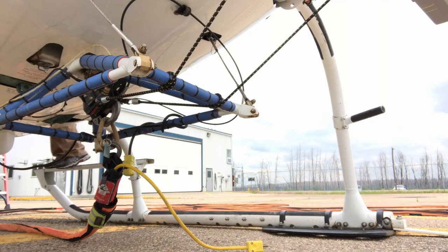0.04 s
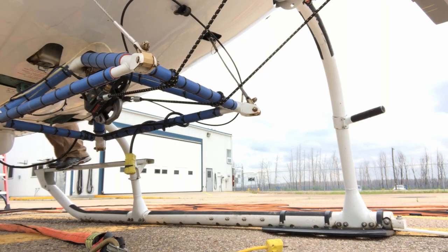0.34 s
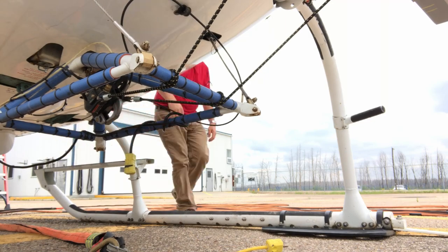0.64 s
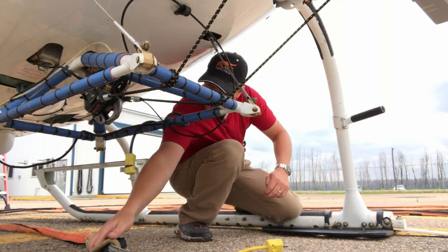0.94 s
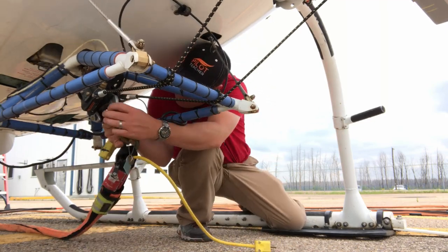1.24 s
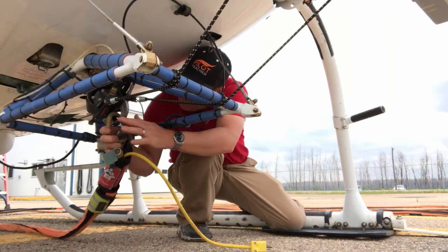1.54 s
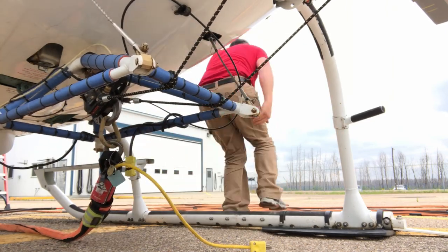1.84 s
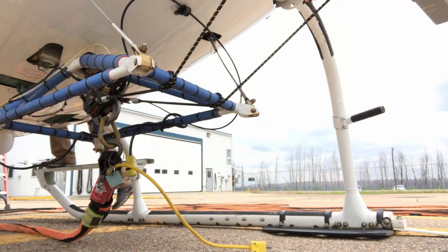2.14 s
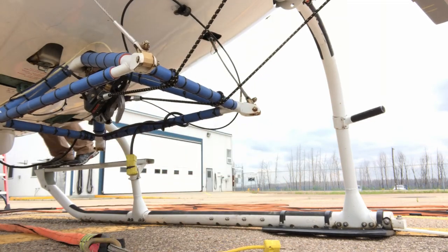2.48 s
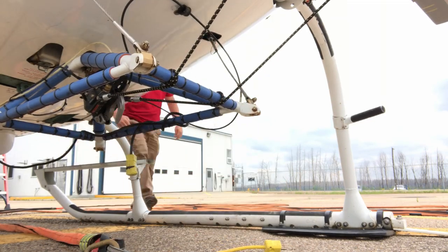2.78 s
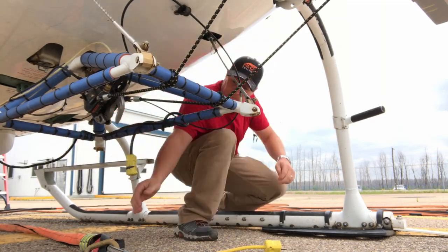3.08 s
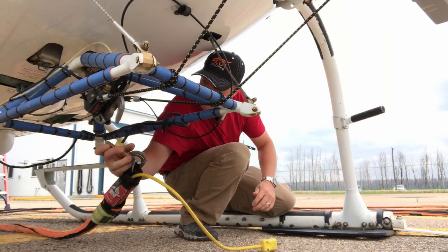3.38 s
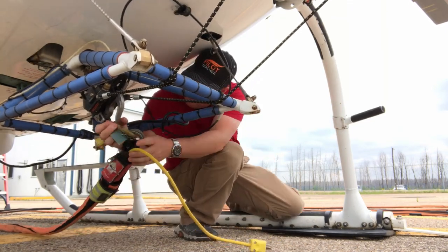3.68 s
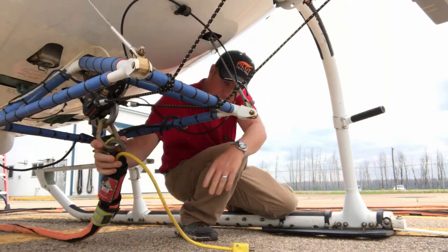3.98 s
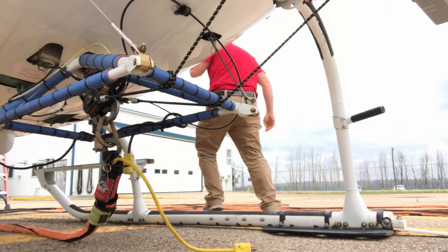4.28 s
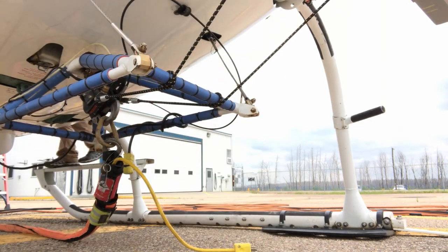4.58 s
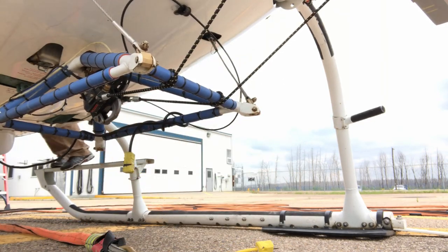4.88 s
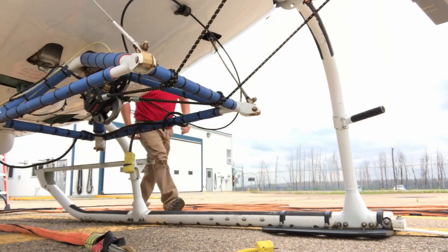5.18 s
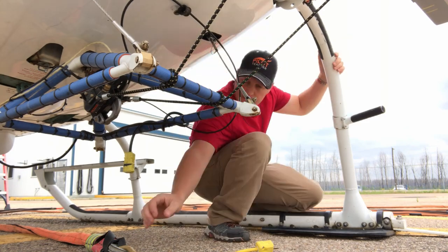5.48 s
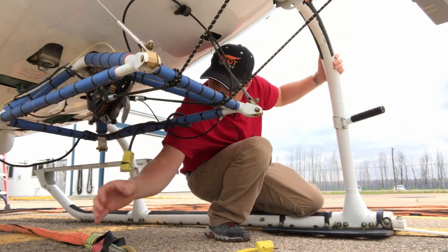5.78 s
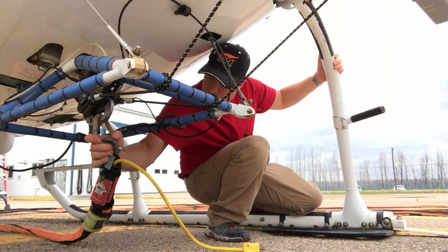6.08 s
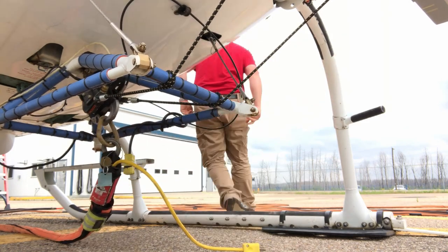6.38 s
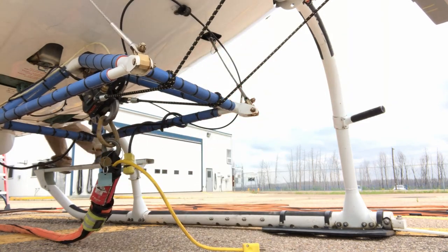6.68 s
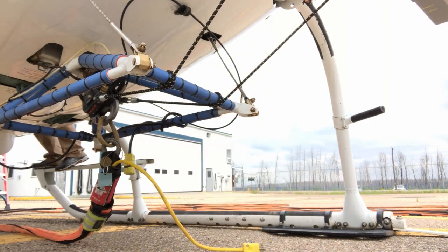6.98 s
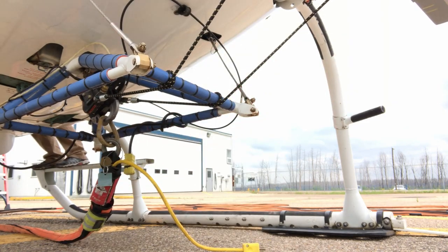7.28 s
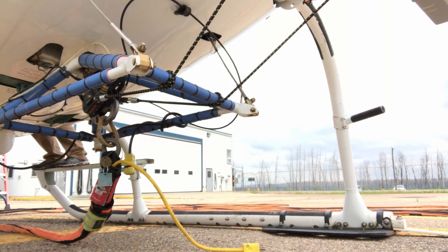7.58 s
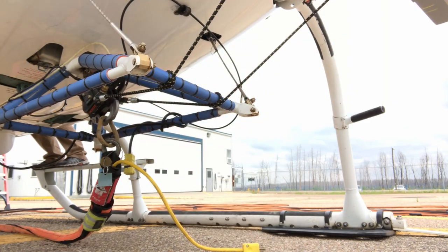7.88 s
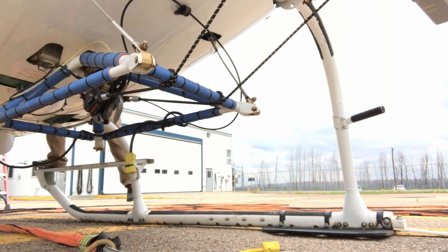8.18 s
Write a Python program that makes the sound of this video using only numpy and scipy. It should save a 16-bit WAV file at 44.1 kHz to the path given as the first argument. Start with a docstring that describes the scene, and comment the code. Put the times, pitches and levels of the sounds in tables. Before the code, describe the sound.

Sharp, fast-forwarded metal clanks and jingling links as a fitting is hooked on repeatedly outdoors, among scuffing boots and soft thuds.

```python
"""Fast-forwarded work under a parked helicopter: a steel line fitting is hooked on, released and dropped.
It opens on a clank over a far drone; the speed-up squeezes each knock into a few dense milliseconds.
From 1 s on the fitting is hung on the cargo hook three times: impacts excite the modes of hook, links
and ring, the airframe booms, cloth rustles, and boots scuff and thump on the apron.
Near 8 s the drone has faded; a distant toot sounds and wind gusts around the last clanks."""
import sys
import numpy as np
from scipy import signal
from scipy.fft import rfft, irfft
from scipy.io import wavfile

SR = 44100
rng = np.random.default_rng(int(sys.argv[2]) if len(sys.argv) > 2 else 0)


def store_pcm(level_fs):
    """Save levels as 16-bit WAV."""
    pcm = np.round(np.clip(level_fs, -1, 1) * 32767).astype(np.int16)
    wavfile.write(sys.argv[1], SR, np.atleast_2d(pcm).T)


N = 367794
TIME = np.arange(N) / SR


def amp(db):
    """Amplitude ratio of a level in decibels."""
    return 10 ** (np.asarray(db) / 20)


def unit_rms(x):
    """Normalisation to unit mean power."""
    return x / np.sqrt(np.mean(x ** 2) + 1e-20)


def add(mix, onset_s, sound):
    """Superposition: the sound is summed into the mix from its onset."""
    part = mix[max(round(onset_s * SR), 0):][:len(sound)]
    part += sound[:len(part)]


def spectrum_db(points, hz):
    """Spectral envelope, interpolated over logarithmic frequency."""
    f, db = np.transpose(points)
    return np.interp(np.log(hz + 1), np.log(f), db)


def resonance_db(peaks, hz):
    """Resonance: each peak raises the level along a Lorentzian curve."""
    return sum(db / (1 + (2 * (hz - f) / width) ** 2) for f, width, db in peaks)


def band_pass(centre_hz, slope_db):
    """Band-pass response: the level falls with the distance in octaves from the centre."""
    return lambda hz: -slope_db * abs(np.log2((hz + 1) / centre_hz)) ** 1.2


def noise(colour, peaks=()):
    """Spectral shaping: white noise takes on an envelope and resonances."""
    hz = np.fft.rfftfreq(N, 1 / SR)
    response = amp(spectrum_db(colour, hz) + resonance_db(peaks, hz))
    return unit_rms(irfft(rfft(rng.standard_normal(N)) * response, N))


def fluctuation(window_samples):
    """Random modulation: low-passed noise, limited to two standard deviations."""
    smooth = signal.oaconvolve(rng.standard_normal(N), np.hanning(window_samples), "same")
    return np.clip(unit_rms(smooth), -2, 2)


def burst(colour_db, half_s, tail_db, tail_s, shape, ripple_db, lag_s=0, lag_below_hz=910, size=8192):
    """A knock or brush, smeared by the speed-up into a noise pulse with a weak tail.
    Returns time to peak and sound."""
    t = (np.arange(size) - size // 2) / SR
    hz = np.fft.rfftfreq(size, 1 / SR)
    swell = np.exp(-abs(t / max(half_s, 1e-3)) ** shape)
    tail = amp(tail_db) * np.exp(-abs(t) / tail_s) * (t > 0)
    envelope = np.hypot(swell, tail)
    # each point of contact favours other resonances: one random weight every 260 Hz
    weights = np.clip(rng.standard_normal(256), -2, 2)
    ripple = ripple_db * np.interp(hz / 260, np.arange(256), weights) * np.minimum(hz / 1000, 1)
    # dispersion: low bending waves travel slowly and arrive late
    dispersion = np.exp(-2j * np.pi * lag_s * lag_below_hz * np.arctan(hz / lag_below_hz))
    excitation = rfft(envelope * rng.standard_normal(size))
    sound = irfft(excitation * amp(colour_db(hz) + ripple) * dispersion)
    return -t[0], unit_rms(sound) * np.sqrt(np.mean(envelope ** 2))


def vibration(modes, t60, free_s, rise_s, scatter_db, detune, flutter_db, flutter_hz=45):
    """Damped modes swell, flutter and are choked after free_s; returns time to peak and sound."""
    hz, db = np.transpose(modes)
    lead_s = 3 * rise_s
    t = np.arange(12000)[:, None] / SR - lead_s
    weight, shift, phase, pace, offset = rng.standard_normal((5, len(hz)))
    flutter = amp(flutter_db * np.sin(2 * np.pi * (flutter_hz * np.exp(pace / 2) * t + offset)))
    sines = np.sin(2 * np.pi * (hz * (1 + detune * shift) * t + phase))
    partials = amp(db + scatter_db * weight) * flutter * sines
    t = t[:, 0]
    rise = np.exp(-(np.minimum(t, 0) / rise_s) ** 2)
    decay = amp(-60 * np.maximum(t, 0) / t60)
    choke = np.exp(-(np.maximum(t - free_s, 0) / 0.005) ** 2)
    return lead_s, unit_rms(partials.sum(1)) * rise * decay * choke


def favoured(modes, note_hz, width_hz=60, lift_db=13):
    """Selective excitation: the point of contact lifts the modes near one note."""
    return [(hz, db + resonance_db([(note_hz, width_hz, lift_db)], hz)) for hz, db in modes]


# spectrum of the open air: f/Hz, level/dB
AIR_SPECTRUM = [(20, -14), (60, -5), (150, 2), (300, -4.5), (600, -14), (1200, -22.5), (2500, -31),
                (7000, -29.5), (16000, -47)]
# spectrum of the far machine: f/Hz, level/dB
DRONE_SPECTRUM = [(40, -13.5), (140, -7), (270, -8.5), (800, -12.5), (1050, -19), (3000, -43.5)]
# its humming bands: f/Hz, width/Hz, lift/dB
DRONE_BANDS = [(148, 81, 8), (197, 3.6, 11.5), (271.4, 4.4, 14.5), (475.2, 5.8, 17)]
# its fading envelope: t/s, level/dB
DRONE_ENVELOPE = [(0, -44), (.9, -47), (1.6, -48), (2.2, -54.5), (4.2, -55), (4.8, -57.5), (8.34, -69.5)]
# gusts on the microphone: t/s, level/dB
WIND_ENVELOPE = [(0, -72.5), (3.5, -72.5), (4.6, -54), (7.3, -61), (7.8, -40.5), (7.92, -56.5), (8.03, -37),
                 (8.34, -49.5)]


def outdoors(air_db=-58):
    """Incoherent noise sources add: steady air, a fading machine drone and low gusts of wind."""
    wind = noise([(20, -12.5), (60, 7), (130, -3.5), (300, -20), (1000, -52)])
    air = amp(air_db) * noise(AIR_SPECTRUM)
    drone = noise(DRONE_SPECTRUM, DRONE_BANDS)
    gain = lambda envelope: amp(np.interp(TIME, *np.transpose(envelope)))
    return air + gain(DRONE_ENVELOPE) * drone + gain(WIND_ENVELOPE) * wind


# partials of the distant toot: harmonic number, rms level/dB
TOOT_HARMONICS = [(2, -54.5), (3, -55.5), (4, -72.5)]


def toot(onset_s=7.752, length_s=0.088, fundamental_hz=384):
    """Harmonic series with a missing fundamental: one short tone far across the apron."""
    out = np.zeros(N)
    phase = 2 * np.pi * fundamental_hz * np.arange(int(length_s * SR)) / SR
    tone = sum(np.sqrt(2) * amp(db) * np.sin(k * phase) for k, db in TOOT_HARMONICS)
    add(out, onset_s, tone * signal.windows.tukey(len(tone), 0.25))
    return out


# the fitting is lifted and hooked on: pick-up t/s, let-go t/s, rustle level/dB
HOOKUPS = [(1.1, 1.75, -54.5), (3.3, 4.107, -49.5), (6.006, 6.22, -49)]


def handling(step_db=-21, reach_s=0.055, ease_s=0.12):
    """Amplitude envelope of the rustle: it swells around each scuff and each grip on the fitting."""
    t = TIME[::256]
    steps = sum(amp(db + step_db) * np.exp(-abs(t - s) / reach_s) for s, db, _ in SCUFFS)
    grips = sum(amp(db) * np.exp(-((t - np.clip(t, lift_s, free_s)) / ease_s) ** 2)
                for lift_s, free_s, db in HOOKUPS)
    return np.interp(TIME, t, steps + grips)


def rustle(gain_db=-7, shared_db=5, apart_db=3, hiss_db=-68):
    """Friction noise of cloth and rope: two bands, partly correlated in level, over a steady hiss."""
    dull = noise([(100, 3), (500, 4), (2000, -2.5), (8000, -32)])
    bright = noise([(500, -12), (3500, -0.5), (9000, -13), (16000, -23)])
    hiss = amp(hiss_db) * (dull + 0.71 * bright)
    swell = amp(gain_db + shared_db * fluctuation(900)) * handling()
    dull_rub = dull * amp(apart_db * fluctuation(900))
    bright_rub = 0.69 * bright * amp(apart_db * fluctuation(900))
    return swell * (dull_rub + bright_rub) + hiss


# soft swishes: t/s, level/dB, half length/s, centre f/Hz
SWISHES = [(0.724, -45.5, 0.2, 580), (5.515, -54, 0.03, 2380), (6.395, -44.5, 0.028, 3200)]


def swishes(grit_db=4):
    """Slow swells of band noise, roughened by random amplitude modulation."""
    out = np.zeros(N)
    for s, db, half_s, centre_hz in SWISHES:
        lead_s, sound = burst(band_pass(centre_hz, slope_db=19), half_s, tail_db=-15.5, tail_s=half_s,
                              shape=1.6, ripple_db=1.5, size=32768)
        add(out, s - lead_s, amp(db) * sound)
    return out * amp(grit_db * fluctuation(300))


# spectrum of a scuff: f/Hz, level/dB
SCUFF_SPECTRUM = [(40, -19.5), (200, -1), (600, -0.5), (1300, 1), (2800, -3), (5000, -7.5), (9000, -21.5),
                  (16000, -33)]
# boots, clothes and the line rubbing on the ground: t/s, level/dB, bass lift/dB
SCUFFS = [(0.213, -44, -4), (0.551, -47.5, 7.5), (0.673, -51, 1), (0.949, -44, 5), (1.247, -45.5, -40),
          (1.301, -40.5, -37), (1.78, -40.5, 4), (1.82, -35.5, 11), (1.845, -41, 2.5), (2.051, -46.5, 12),
          (2.303, -50.5, 4), (2.437, -42, -2), (2.796, -46.5, 8), (3.091, -43.5, 4), (3.39, -48, -20),
          (3.514, -41, 9), (3.774, -39.5, -21), (4.198, -43.5, -5), (4.281, -41.5, 9), (4.402, -47.5, 1),
          (4.674, -51, 4), (5.314, -46, 15.5), (5.377, -48.5, 11.5), (5.475, -43.5, 2.5),
          (5.702, -46, -42.5), (6.39, -37, 5.5), (6.443, -42.5, 13.5), (6.504, -39, 7), (6.685, -42.5, 5),
          (6.796, -46, 13), (6.918, -46, 9), (6.955, -44, 3), (7.003, -39.5, 8), (8.177, -37.5, 5.5),
          (8.295, -36.5, 19)]


def scuffs(gain_db=1):
    """Sliding friction: soles and webbing give brief, dull brushes of noise."""
    out = np.zeros(N)
    for s, db, bass_db in SCUFFS:
        shelf = [(700, bass_db), (1700, 0.01)]
        colour = lambda hz: spectrum_db(SCUFF_SPECTRUM, hz) + spectrum_db(shelf, hz)
        lead_s, sound = burst(colour, half_s=0.01, tail_db=-19, tail_s=0.14, shape=2.6, ripple_db=4.5)
        add(out, s - lead_s, amp(db + gain_db) * sound)
    return out


# footfalls, hollow bumps and the line landing: t/s, level/dB, centre f/Hz
THUMPS = [(0.344, -29, 260.5), (0.981, -36, 300), (1.672, -29, 334), (1.964, -32, 680), (2.536, -26, 400),
          (2.791, -34, 159), (4.142, -33, 716), (4.802, -32, 303), (4.911, -32, 247), (5.594, -24.5, 88.3),
          (5.661, -33, 93), (6.306, -29.5, 690), (6.682, -39, 199), (6.917, -34.5, 302.6),
          (7.709, -34, 133), (8.002, -28, 151), (8.107, -33, 130)]


def thumps(shake_hz=278, boom_hz=105, growth_db_per_db=2.78):
    """Heavily damped impacts: thuds, and after each clank a shake of the airframe and a belly boom."""
    out = np.zeros(N)
    blows = [(s, growth_db_per_db * (db - REFERENCE_BLOW_DB)) for s, db, *_ in CLANKS]
    shakes = [(s + 0.012, db - 47, shake_hz) for s, db in blows]
    booms = [(s + 0.035, db - 50.5, boom_hz) for s, db in blows]
    for s, db, centre_hz in THUMPS + shakes + booms:
        lead_s, sound = burst(band_pass(centre_hz, slope_db=10.5), half_s=0.008, tail_db=-18,
                              tail_s=0.045, shape=1.4, ripple_db=4.5)
        add(out, s - lead_s, amp(db) * sound)
    return out


# natural modes of the links: f/Hz, level/dB
LINK_MODES = [(3941, -16), (4102, -10), (4372, -3.5), (4420, -7.5), (4510, -5), (4690, -11.5),
              (5020, -17.5), (5825, -14.5), (9750, -12.5), (10400, -11), (10700, -8), (10880, -9),
              (13700, -12.5)]
# the links are gripped or swing free: t/s, level/dB, T60/s, leading f/Hz
JINGLES = [(0.291, -21.5, 0.36, 4510), (0.352, -30.5, 0.087, 4510), (1.055, -18, 0.027, 4372),
           (1.078, -25, 0.084, 4372), (1.164, -34, 0.029, 4102), (1.401, -22.5, 0.058, 4510),
           (1.44, -28.5, 0.061, 4102), (1.604, -28.5, 0.11, 4300), (1.651, -23.5, 0.073, 4440),
           (1.718, -22, 0.076, 4380), (1.757, -31, 0.079, 4670), (3.279, -17.5, .03, 4372),
           (3.326, -32.5, 0.042, 4500), (3.851, -23, 0.057, 4500), (4.049, -36, 0.23, 4420),
           (4.106, -39, 0.095, 4340), (4.157, -45.5, 0.2, 4372), (4.208, -47, 0.06, 4372),
           (4.235, -36, 0.055, 4420), (4.269, -34, 0.027, 4372), (4.304, -46, 0.04, 4410),
           (4.841, -31, 0.14, 4102), (4.925, -31, 0.067, 9750), (5.887, -29, 0.026, 4690),
           (5.918, -35.5, 0.019, 4372), (6.181, -28.5, 0.011, 4102), (8.018, -36.5, 0.17, 5020),
           (8.119, -25.5, 0.011, 4510)]


def link_jingles(gain_db=-1):
    """Modal vibration of light steel links, fluttering as they touch."""
    out = np.zeros(N)
    for s, db, t60, note_hz in JINGLES:
        lead_s, sound = vibration(favoured(LINK_MODES, note_hz), t60, free_s=0.036, rise_s=0.006,
                                  scatter_db=3.5, detune=0.0015, flutter_db=3)
        add(out, s - lead_s, amp(db + gain_db) * sound)
    return out


def link_friction(gain_db=-18, growth_db_per_db=0.91, grit_db=-15, relative_width=0.014):
    """Forced vibration: around each jingle the links slide, and friction faintly drives their modes."""
    def colour(hz):
        mode_power = sum(amp(2 * db) / (1 + (2 * (hz - f) / (relative_width * f)) ** 2)
                         for f, db in LINK_MODES)
        grit_power = amp(2 * grit_db + spectrum_db(CLANK_SPECTRUM, hz))
        return 10 * np.log10(mode_power + grit_power)

    out = np.zeros(N)
    for s, db, *_ in JINGLES:
        lead_s, sound = burst(colour, half_s=0.011, tail_db=-17, tail_s=0.081, shape=3.6, ripple_db=1)
        add(out, s - lead_s, amp(gain_db + growth_db_per_db * db) * sound)
    return out


# natural modes of the heavy steel ring: f/Hz, level/dB
RING_MODES = [(3892, -5), (4102, -9), (4535, -11), (5014, -16.5), (5830, -22), (9760, -18), (10379, -18)]
# blows on the ring: t/s, level/dB, time until damped/s, leading f/Hz
CHIMES = [(0.322, -16.5, .031, 3892), (3.508, -28, 0.015, 3892), (3.892, -33.5, 0.026, 3892),
          (3.909, -12.5, 0.0028, 3892), (4.886, -20, 0.02, 5014), (4.886, -30.5, .016, 4535),
          (4.897, -22.5, .009, 3892), (6.007, -22.5, 0.0049, 3892), (8.066, -22, 0.035, 3892)]


def ring_chimes():
    """Free vibration: the struck ring sounds clear notes until it is damped."""
    out = np.zeros(N)
    for s, db, free_s, note_hz in CHIMES:
        lead_s, sound = vibration(favoured(RING_MODES, note_hz), t60=0.23, free_s=free_s, rise_s=0.0046,
                                  scatter_db=2.5, detune=0.0004, flutter_db=2.5)
        add(out, s - lead_s, amp(db) * sound)
    return out


# natural modes of the hook's frame: f/Hz, level/dB
FRAME_MODES = [(430.7, -37.5), (1007, -36.5), (1330, -35), (1701, -40), (1841, -39.5), (2105, -41),
               (2374, -42), (3397, -37.5)]
# the jaw closes: t/s, level/dB
LATCHES = [(1.66, -27.5), (1.688, -26.5), (6.086, -27.5), (6.133, -27.5)]


def latches():
    """Impulse response of the hook's frame: a short, low clang as the jaw closes."""
    out = np.zeros(N)
    for s, db in LATCHES:
        lead_s, sound = vibration(FRAME_MODES, t60=0.11, free_s=0.055, rise_s=0.0017,
                                  scatter_db=2, detune=0.002, flutter_db=0.5)
        add(out, s - lead_s, amp(db) * sound)
    return out


# spectrum of a hard blow: f/Hz, level/dB
CLANK_SPECTRUM = [(40, -18.5), (150, -10), (350, -15), (750, -10), (1200, -5.5), (2500, -2.5), (3200, -5.5),
                  (5000, -2.5), (6200, -6), (9000, -9.5), (12500, -10.5), (16000, -25.5)]
# resonances of the hook and its fittings: f/Hz, width/Hz, lift/dB
HOOK_RESONANCES = [(363, 66, 14.5), (1930, 60, 5.5), (2327, 90, 3.5), (2540, 80, 1), (2820, 40, 3.5),
                   (3930, 340, 7.5), (4647, 45, 4), (4690, 560, 5), (7570, 190, 5.5), (9760, 120, 5),
                   (10240, 220, 5), (13690, 650, 5)]
# steel on steel or asphalt, or a boot on the step: t/s, level/dB, half length/s, treble/dB, clack f/Hz
CLANKS = [(0.305, -10, 0.0026, 6, 2620), (0.337, -24.5, 0.012, 3, 3900), (1.053, -26, 0.0017, 9.5, 4300),
          (1.08, -33.5, .0027, 23, 4400), (1.132, -27.5, 0.0075, -1.5, 1300),
          (1.347, -19, 0.0036, -1.5, 2620), (1.514, -32, 0.0042, 6, 4530), (1.581, -18, 0.012, 1.5, 3950),
          (1.645, -17, 0.0066, -0.5, 2570), (1.663, -30.5, 0.016, 0, 1900), (1.69, -25.5, 0.013, -7, 3400),
          (1.72, -33, 0.0029, 18, 4340), (1.96, -42, 0.0023, -23, 1150), (2.481, -35, 0.0085, -4.5, 2020),
          (2.526, -14.5, 0.01, 9.5, 1710), (2.52, -9.5, 0.00084, 5.5, 4540), (3.276, -25, 0.0036, -4, 4250),
          (3.595, -27, 0.0066, 8.5, 4400), (3.616, -26, 0.0044, -11.5, 1490),
          (3.793, -36, 0.0086, 12, 4350), (3.91, -9, 0.0039, 1.5, 2540), (3.944, -20, 0.0071, -2, 1930),
          (3.958, -13, 0.0088, -1, 2560), (3.99, -16.5, 0.0083, -8.5, 2500),
          (4.014, -7.5, 0.0066, -1, 3350), (4.793, -34, 0.0054, -4, 1090), (4.872, -14, 0.0048, -3.5, 1250),
          (4.897, -20.5, 0.012, 3.5, 3100), (5.106, -35, 0.0026, -25.5, 2060),
          (5.757, -30.5, 0.0027, 1, 2443), (5.772, -21.5, 0.0047, 9, 4370), (5.891, -29, 0.008, 11.5, 4640),
          (6.011, -14.5, 0.0049, -2, 4370), (6.03, -23, .01, -9, 2670), (6.061, -10, 0.0052, 1, 1150),
          (6.081, -7.5, .0045, 4, 4480), (6.098, -10, 0.0099, -3.5, 2520), (6.129, -6.5, 0.0069, 4, 2600),
          (6.153, -23.5, 0.0064, -9, 4360), (6.302, -37.5, 0.0015, -34, 1000),
          (6.723, -35, 0.0056, -27.5, 1400), (6.992, -30, 0.0062, -37, 1660),
          (7.991, -23.5, 0.0072, -6.5, 2870), (8.053, -16, .005, 4, 3170), (8.066, -22.5, 0.006, 3, 1860),
          (8.119, -22, 0.0036, -0.5, 2240)]
REFERENCE_BLOW_DB = -12


def clanks(clack_width_hz=380, clack_db=8.5):
    """Source and filter: hard knocks pass through the resonances of the hook and of the struck part."""
    out = np.zeros(N)
    for s, db, half_s, treble_db, clack_hz in CLANKS:
        body_db = -4 - 0.5 * (db - REFERENCE_BLOW_DB)  # a light touch has more body than a hard blow
        tilt = [(600, body_db), (1500, 0.022), (3000, 0.0018), (7000, treble_db)]
        peaks = HOOK_RESONANCES + [(clack_hz, clack_width_hz, clack_db)]
        colour = lambda f: spectrum_db(CLANK_SPECTRUM, f) + resonance_db(peaks, f) + spectrum_db(tilt, f)
        lead_s, sound = burst(colour, half_s, tail_db=-20, tail_s=0.011, shape=1.7, ripple_db=2.6,
                              lag_s=0.007)
        add(out, s - lead_s, amp(db) * sound)
    return out


def scene():
    """Superposition of all sources at one microphone close to the ground."""
    metal = clanks() + latches() + link_jingles() + ring_chimes() + link_friction()
    return (metal + scuffs() + thumps() + swishes() + rustle() + toot() + outdoors())[None]


def record(dry, cutoff_hz=16000):
    """Hard clipping at full scale, then band limiting by a low-pass filter."""
    low_pass = signal.firwin(511, cutoff_hz, window=("kaiser", 9), fs=SR)
    return signal.oaconvolve(np.clip(dry, -1, 1), low_pass[None], "same")


dry = scene()
out = record(dry)
store_pcm(out)
```